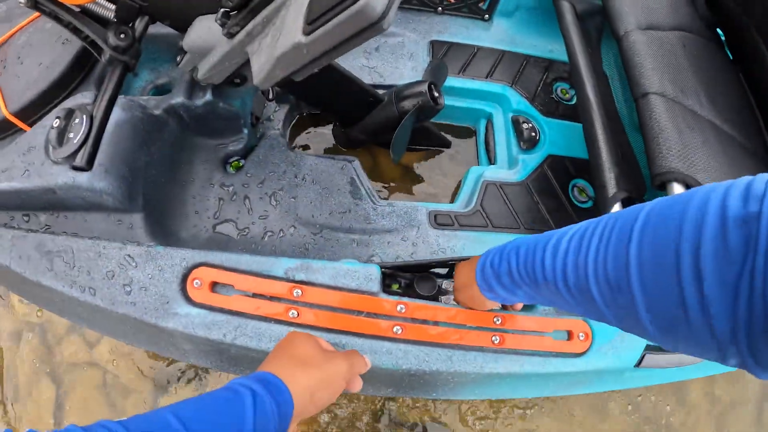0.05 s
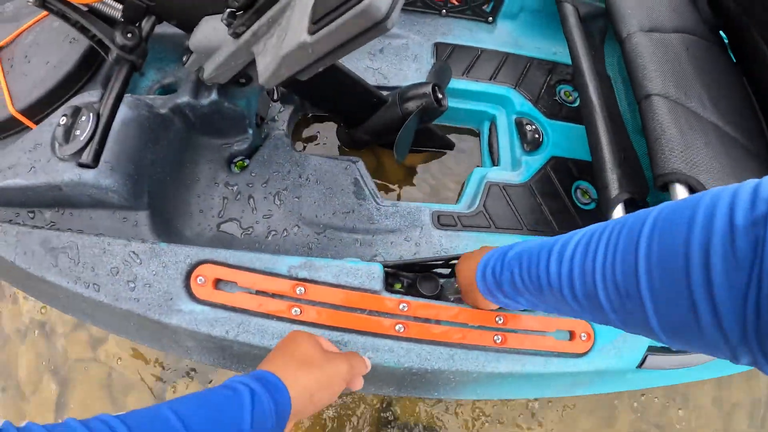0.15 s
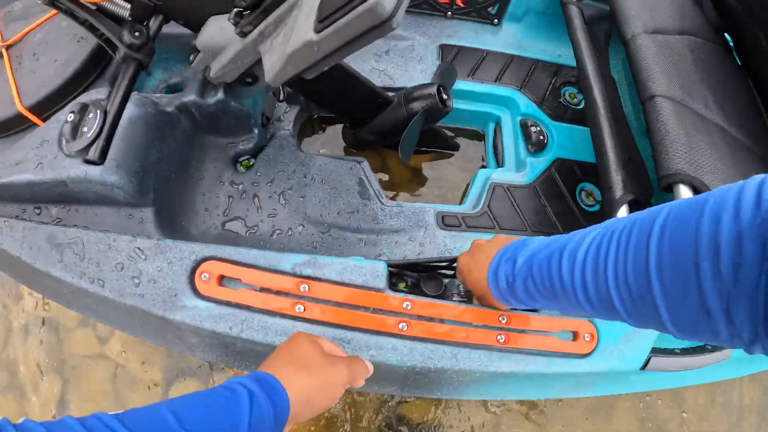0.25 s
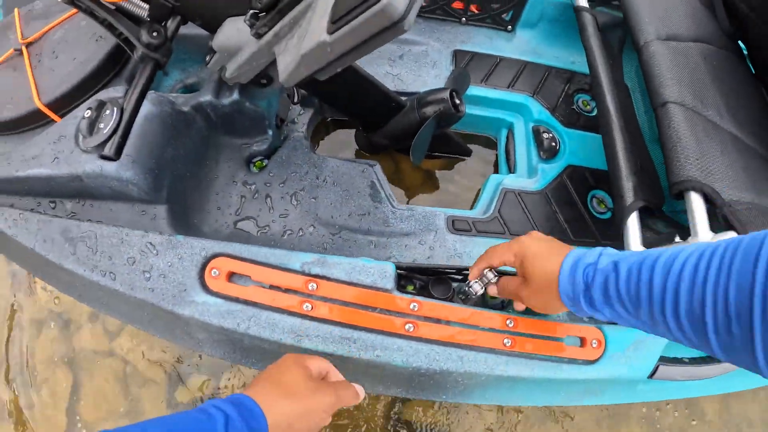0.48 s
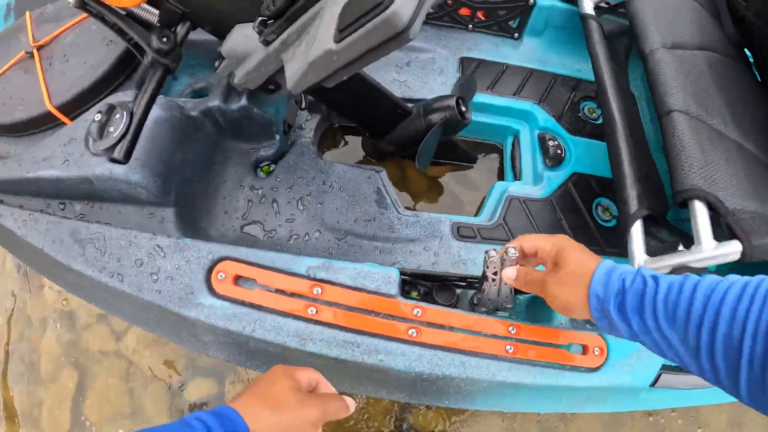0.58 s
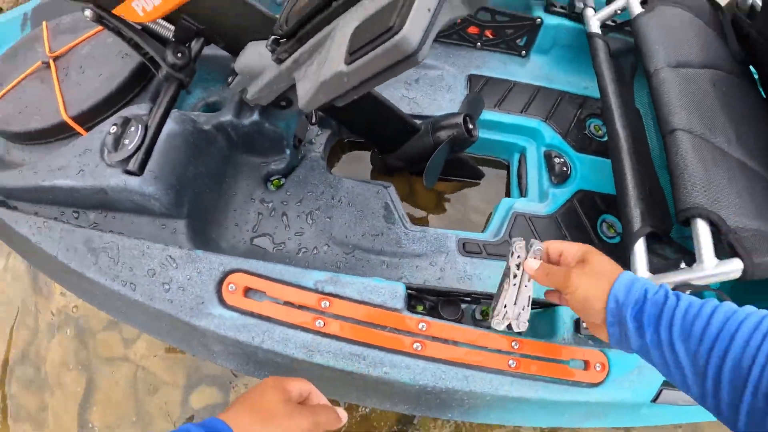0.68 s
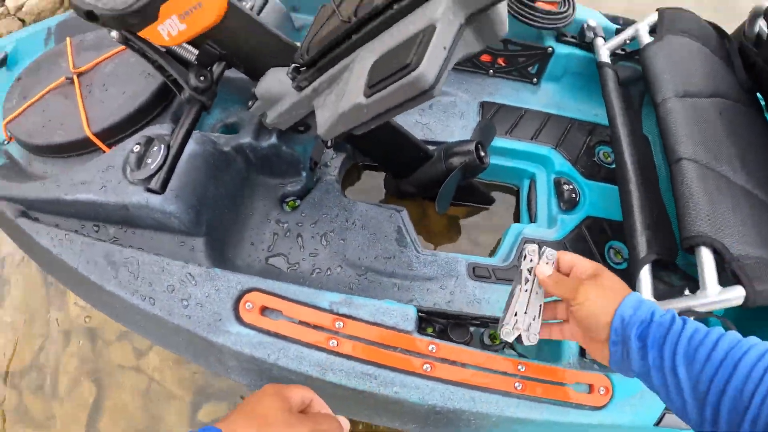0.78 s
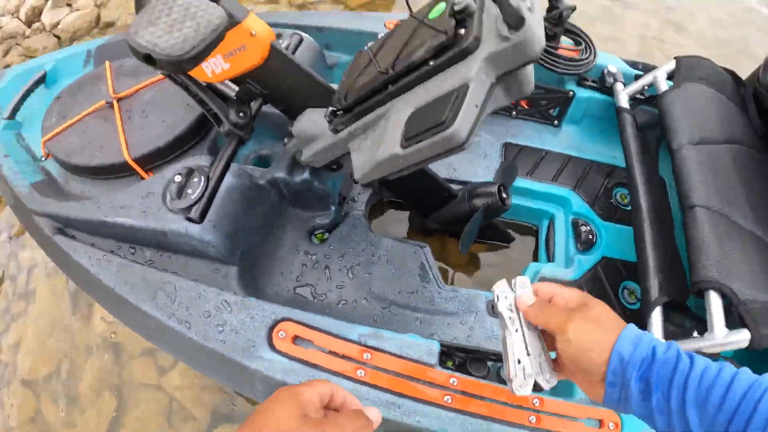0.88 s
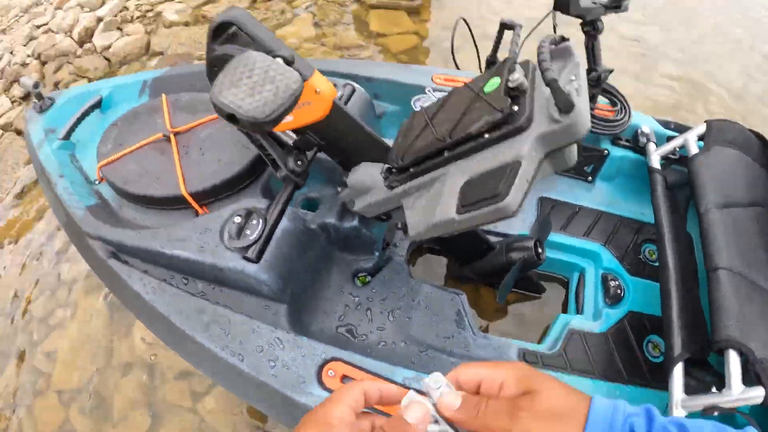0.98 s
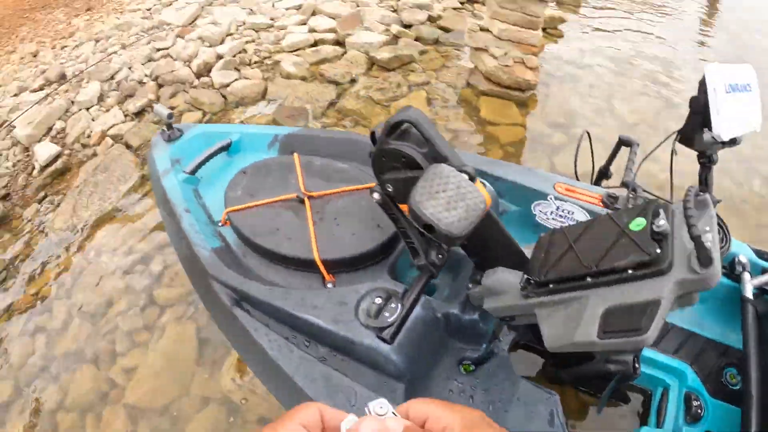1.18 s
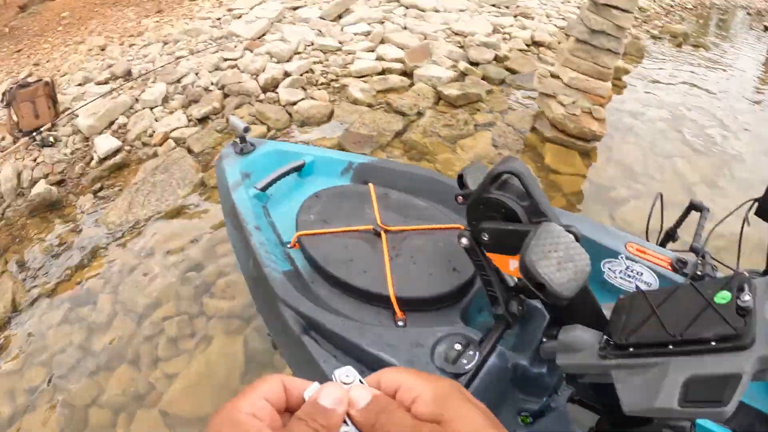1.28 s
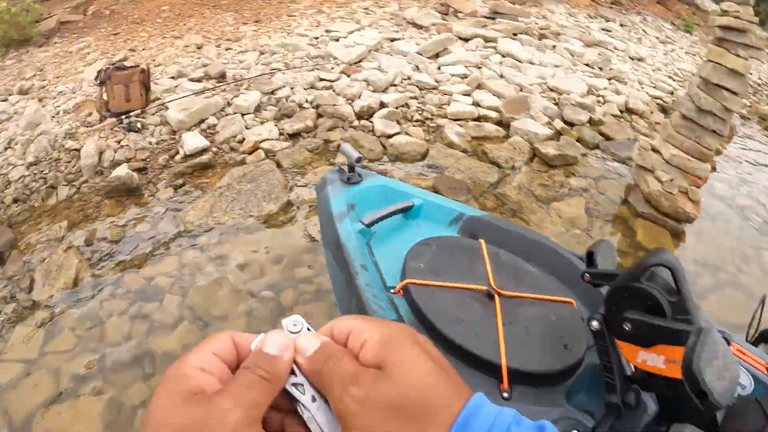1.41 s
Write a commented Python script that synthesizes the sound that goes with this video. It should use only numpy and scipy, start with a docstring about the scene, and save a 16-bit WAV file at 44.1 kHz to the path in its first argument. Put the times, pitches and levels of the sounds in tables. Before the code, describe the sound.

Hollow knocks clatter close by as a steel tool is pulled from a plastic kayak's side pocket, scraping and ringing thinly. Soft handling bumps and a few light taps follow over a quiet lakeshore.

```python
"""Hollow knocks and scrapes sound an arm's length away: a steel multi-tool is being fished out of a side pocket
of a plastic kayak. Each impact excites the hull's resonant modes and leaves a thin metallic ring; between
impacts, stick-slip friction scrapes and drums on the plastic. Soft low bumps, small taps and faint finger
slides follow, over a quiet lakeshore."""
import sys
import numpy as np
from scipy import signal
from scipy.fft import rfft, irfft
from scipy.io import wavfile

SR = 44100
rng = np.random.default_rng(int(sys.argv[2]) if len(sys.argv) > 2 else 0)


def pcm_store(signal):
    """Save signal as 16-bit PCM."""
    levels = np.round(np.clip(np.atleast_2d(signal), -1, 1) * 32767)
    wavfile.write(sys.argv[1], SR, levels.astype(np.int16).T)


N = 63945
T = np.arange(N) / SR
LR = np.array([[1], [-1]])  # sign of the left and right channel

# Impacts in the pocket (time [s], then thud, body, knock, clack, tick and snap strength [dB])
KNOCKS = [(0.19, -24, -50, -47.5, -52, -56.5, -54), (.204, -25, -14, -29, -28.5, -43, -38.5),
          (.228, -30.5, -22, -75, -60, -62, -63), (0.2952, -47, -48, -28.5, -35.5, -42.5, -61),
          (0.325, -32.5, -39.5, -29, -31, -48, -73), (0.3433, -27, -23.5, -34.5, -29, -46, -69),
          (.349, -22, -29, -30, -26.5, -37.5, -62), (.442, -17, -28, -31.5, -37.5, -45.5, -40.5),
          (0.448, -25.5, -14, -95, -18.5, -44.5, -61), (.483, -30.5, -20.5, -26, -26, -35.5, -59),
          (0.4968, -21.5, -26, -28.5, -23.5, -40.5, -47), (0.5456, -21.5, -15.5, -24, -19, -26.5, -35.5),
          (0.557, -13, -16, -27.5, -24.5, -46, -42), (0.6621, -43, -30, -24.5, -18.5, -32.5, -36.5),
          (.674, -26, -30, -37, -23.5, -39, -53), (.680, -19.5, -45, -26, -25.5, -39.5, -43),
          (.699, -22.5, -22.5, -33.5, -39, -39.5, -46), (.712, -20, -23.5, -29.5, -26.5, -53, -53),
          (0.7456, -32, -26, -28.5, -23.5, -33, -39)]
# Light taps (time [s], pitch [Hz], level [dB], t60 [s], upper mode [Hz], upper level [dB],
# click centre [Hz], click level [dB], ring excitation [dB], left minus right [dB])
TAPS = [(1.1149, 156.7, -31, 0.12, 314, -36.5, 842, -33, -26.5, 7),
        (1.306, 645, -53.5, 0.13, 706, -59, 696, -60.5, -58, 1),
        (1.392, 1417, -49.5, 0.069, 1460, -52, 1280, -56, -61, 0),
        (1.400, 333.3, -38.5, 0.28, 1167, -49.5, 1040, -45, -55, 0.5)]
# Diffuse share of the sound (frequency [Hz], side minus mid [dB])
DIFFUSE_SIDE = [(60, -20.5), (380, -28), (700, -9.5), (1300, -18.5), (2300, -4), (4400, -17.5), (13000, -5)]


def knocks():
    """Modal response: each impact rings the hull, with a spectrum set by the contact."""
    # Thud to snap, the six strengths of an impact (frequency [Hz])
    strength_hz = [120, 330, 720, 1550, 4800, 11000]
    # Hull and pocket wall modes (frequency [Hz], relative level [dB], t60 [s])
    hull_modes = [(76.6, -8.5, 0.17), (124.1, -0.5, 0.19), (165, -9, 0.18), (203.5, -3, 0.12),
                  (277, -8, 0.15), (320.6, -6, 0.058), (399.1, -1, 0.12), (628.6, -2.5, 0.085),
                  (720.5, -3, 0.089), (1021.5, -4, 0.092), (1378, -3, 0.052), (1600, -9, 0.032),
                  (1848, -6.5, 0.048), (2083, -1, 0.039)]
    # Short, hard modes at the contact (frequency [Hz], relative level [dB], t60 [s])
    contact_modes = [(3045, -8, 0.025), (3590, -10, 0.043), (4700, -2.5, 0.02), (5200, 0.5, 0.015),
                     (5827, -3, 0.02)]
    # Dense modes of the plastic (frequency [Hz], relative level per half octave [dB], t60 [s])
    plastic = [(70, -14.5, 0.29), (202, -11, 0.14), (470, -4, 0.093), (920, -4, 0.057), (1570, -4.5, 0.032),
               (2410, -11.5, 0.02), (3520, -8, 0.043), (5000, -5.5, 0.014), (6700, -7, 0.0164),
               (8250, -26, 0.031), (12200, -17.5, 0.032), (16000, -36, 0.015)]
    mode_db, scatter_db, detune_spread = -1, 2, 0.017
    rise_cycles, tail_db, tail_t60_s = 0.52, -21, 0.16
    out, t = np.zeros((2, N)), T[:12288]
    modes = hull_modes + contact_modes
    rise = lambda hz: 1 - np.exp(-t * hz / rise_cycles)
    for start, *levels in KNOCKS:
        strength = lambda hz: amp(over_hz(list(zip(strength_hz, levels)), hz))
        for k, (hz, db, t60) in enumerate(modes):
            scatter, detune, side = rng.standard_normal(3)
            channels = stereo_gains(hz) * np.exp(1j * LR * side * amp(over_hz(DIFFUSE_SIDE, hz)))
            swing = np.imag(channels * np.exp(2j * np.pi * hz * (1 + detune_spread * detune) * t))
            gain = (-1) ** k * strength(hz) * amp(db + mode_db + scatter_db * scatter)
            add(out, start, gain * swing * rise(hz) * decay(t, t60))
        for hz in 65 * 2 ** np.arange(0, 8.1, .5):  # overlapping modes merge into noise bands
            fall = decay(t, over_hz(plastic, hz, column=2)) + amp(tail_db) * decay(t, tail_t60_s)
            dense_modes = burst(hz, hz * np.log(2) * 0.66, rise(hz) * fall)
            add(out, start, dense_modes * strength(hz) * amp(over_hz(plastic, hz)))
    return out


def metal_ring():
    """Free decay: clusters of metal modes sum the energy of successive blows."""
    # Clusters (centre [Hz], width [Hz], relative level [dB], t60 [s], left minus right [dB])
    clusters = [(550, 130, -35.5, 1.47, 12), (1840, 320, -27, 1.06, 6.5), (2280, 163, -24.5, 0.67, 3),
                (3400, 730, -40.5, 1.13, 13), (12750, 2000, -42.5, 0.82, 7)]
    ring_db, tap_limit_hz = -9, 2600  # light taps reach only the lower clusters
    out = np.zeros((2, N))
    hard = [(start, clack) for start, *_, clack, tick, snap in KNOCKS]
    light = [(start, db) for start, *_, db, pan in TAPS]
    for hz, width, db, t60, pan_db in clusters:
        blows = hard + light if hz < tap_limit_hz else hard
        energy = sum((T > at) * (amp(level) * decay(np.abs(T - at), t60)) ** 2 for at, level in blows)
        out += band(hz, width, N, wide_db=3) * np.sqrt(energy) * amp(db + ring_db + LR * pan_db / 2)
    return out


def friction(spectrum, levels):
    """Stick-slip friction: dense, uneven clicks filtered by the plastic."""
    slips_per_s, spread_db = 6000, 3
    slipping = rng.random(N) < slips_per_s / SR
    sizes = amp(spread_db * np.minimum(rng.exponential(size=N), 4))
    clicks = slipping * sizes * rng.standard_normal((2, N))
    return colour(clicks, lambda f: amp(over_hz(spectrum, f)), wide_db=0.5) * fader(levels)


def scrape():
    """Sliding friction: steel rasps across plastic."""
    # Rasp spectrum (frequency [Hz], relative density [dB])
    spectrum = [(200, -8), (600, 9), (1300, 3.5), (2600, -9.5), (5800, -13), (7400, -20.5), (8500, -34),
                (14000, -30), (16000, -54)]
    # Rasp envelope (time [s], level [dB])
    levels = [(0, -72.5), (.05, -59.5), (.17, -98), (.225, -56), (.26, -47.5), (.285, -58.5), (.37, -52.5),
              (0.408, -63), (.47, -50), (.54, -43), (.6, -56), (.65, -55), (0.699, -48), (0.739, -38),
              (0.774, -42), (.81, -65), (.9, -102), (1.201, -63), (1.28, -73), (1.37, -65.5), (1.45, -64.5)]
    return friction(spectrum, levels)


def hull_rub():
    """Forced vibration: rubbing makes the hollow hull drum."""
    # Drumming spectrum (frequency [Hz], relative density [dB])
    spectrum = [(40, -20), (110, 0), (170, 3.5), (420, -6.5), (560, -18), (780, -17), (1300, -43),
                (3000, -69), (12000, -86)]
    # Drumming envelope (time [s], level [dB])
    levels = [(0, -65), (0.022, -46.5), (0.048, -39.5), (0.082, -46), (0.131, -58), (.15, -74), (.19, -62),
              (.25, -39), (.3, -39), (.42, -42), (.52, -37.5), (.6, -33), (.65, -37), (.77, -38.5),
              (0.819, -50.5), (.95, -68.5), (1.1, -64), (1.17, -67.5), (1.37, -66.5), (1.45, -74)]
    return friction(spectrum, levels)


def bumps():
    """Slow forcing: each soft push gives a brief low-frequency wave packet."""
    # Pushes (time [s], frequency [Hz], level [dB], length [cycles], left minus right [dB])
    pushes = [(0.626, 44.7, -32, 1.3, 5), (0.703, 62, -22, 1.2, -5), (.727, 31.4, -29, 3.6, -5),
              (.775, 55.5, -32, 0.8, 17), (0.865, 62, -30.5, 1.7, -4.5), (.893, 72.5, -26, 0.73, -6.5),
              (0.91, 35.1, -25, 1.4, -4.5), (0.913, 96, -29.5, 0.94, -8.5), (0.949, 40, -40, 1.5, -10),
              (1.032, 69, -38.5, 2.9, -6), (1.324, 28.6, -41, 1.34, 3.5)]
    out = np.zeros((2, N))
    for at, hz, db, cycles, pan_db in pushes:
        envelope = np.exp(-(2 * (T - at) * hz / cycles) ** 2)
        out += amp(db + LR * pan_db / 2) * np.sin(2 * np.pi * hz * (T - at)) * envelope
    return out


def taps():
    """Damped oscillation: turned in the hands, the tool taps with a dull click and two modes."""
    click_t60_s, upper_t60_s, attack_s = 0.024, 0.07, 0.00039
    out, t = np.zeros((2, N)), T[:8192]
    attack = 1 - np.exp(-t / attack_s)
    mode = lambda hz, db, t60: amp(db) * np.sin(2 * np.pi * hz * t) * decay(t, t60) * attack
    for start, hz, db, t60, upper_hz, upper_db, click_hz, click_db, _, pan_db in TAPS:
        click = amp(click_db) * burst(click_hz, click_hz, decay(t, click_t60_s) * attack)
        tone = mode(hz, db, t60) + mode(upper_hz, upper_db, upper_t60_s)
        add(out, start, (tone + click) * amp(LR * pan_db / 2))
    return out


def finger_slides():
    """Friction noise: fingers swish faintly over the steel."""
    # Swishes (time [s], half-length [s], centre [Hz], width [Hz], level [dB])
    swishes = [(1.136, 0.016, 1530, 303, -54.5), (1.287, 0.019, 3180, 1200, -65.5),
               (1.329, .007, 4120, 800, -65), (1.425, 0.026, 1300, 397, -59.5),
               (1.44, 0.024, 2650, 700, -63), (1.44, 0.038, 491, 109, -53)]
    return sum(amp(db) * band(hz, width, N) * np.exp(-((T - at) / half_length) ** 2)
               for at, half_length, hz, width, db in swishes)


def shore():
    """Ambient noise: air and water make a quiet, diffuse field."""
    # Shore spectrum (frequency [Hz], relative density [dB])
    spectrum = [(20, 3.5), (70, -2), (150, -13.5), (400, -28.5), (1100, -29.5), (2200, -27), (2700, -36),
                (7000, -44), (10000, -52), (14000, -46), (16000, -67)]
    # Shore envelope (time [s], level [dB])
    levels = [(0, -60), (.17, -60.5), (.8, -54.5), (1.08, -52), (1.2, -51.5), (1.45, -54)]
    noise = rng.standard_normal((2, N))
    return colour(noise, lambda f: amp(over_hz(spectrum, f)), wide_db=7) * fader(levels)


def stereo_gains(hz):
    """Level and phase differences between the channels, as two complex gains."""
    # Level difference (frequency [Hz], left minus right [dB])
    balance = [(60, -2), (380, 1), (700, -3), (1300, 1), (4400, -2), (8000, 2.5), (14000, 2)]
    # Phase difference (frequency [Hz], left lead [rad])
    lead = [(300, -0.019), (1290, -0.42), (2200, -1.3), (2700, 0.47), (3300, -1.3), (4500, -0.66),
            (6500, 0.81), (11000, 0.17)]
    return amp(LR * over_hz(balance, hz) / 2) * np.exp(.5j * LR * over_hz(lead, hz))


def colour(pair, gain, wide_db=0):
    """Mid-side stereo: filter a pair by gain(Hz), at rms 1; wide_db raises the side."""
    f = np.fft.rfftfreq(pair.shape[1], 1 / SR)
    mid, side = rfft(pair) * gain(f)
    side_gain = amp(np.minimum(over_hz(DIFFUSE_SIDE, f) + wide_db, 0))
    return unit(irfft((mid + LR * side * side_gain) * stereo_gains(f), pair.shape[1]))


def band(hz, width, size, wide_db=0):
    """Band-pass filtering: stereo noise in one steep band."""
    noise = rng.standard_normal((2, size))
    return colour(noise, lambda f: 1 / (1 + (2 * (f - hz) / width) ** 6), wide_db)


def burst(hz, width, envelope):
    """Amplitude modulation: band noise with an envelope's shape and energy."""
    return unit(band(hz, width, len(envelope)) * envelope) * np.sqrt(np.mean(envelope ** 2))


def amp(db):
    """Decibels to amplitude ratio."""
    return 10 ** (np.asarray(db) / 20)


def over_hz(table, hz, column=1):
    """Interpolation of a column over log frequency."""
    rows = np.array(table, float)
    return np.interp(np.log(np.maximum(hz, 1)), np.log(rows[:, 0]), rows[:, column])


def fader(table):
    """Gain interpolated from (time [s], level [dB]) points."""
    return amp(np.interp(T, *np.array(table, float).T))


def decay(t, t60):
    """Exponential damping: 60 dB in t60 seconds."""
    return np.exp(-np.log(1000) * t / max(t60, 1e-3))


def unit(x):
    """Normalisation to rms 1."""
    return x / np.sqrt(np.mean(x ** 2) + 1e-30)


def add(out, start, sound):
    """Superposition of a sound from a start time on."""
    i = int(np.clip(start * SR, 0, N - 1))
    out[:, i:i + sound.shape[1]] += sound[:, :N - i]


def scene():
    """Superposition of all sources at the microphone."""
    return knocks() + metal_ring() + taps() + bumps() + finger_slides() + scrape() + hull_rub() + shore()


def record(dry):
    """Frequency response: two narrow dips, a slight peak and a steep treble cut."""
    # Microphone ripples (centre [Hz], width [Hz], gain [dB])
    ripples = [(2450, 225, -1), (4260, 380, 0.5), (870, 87, -4)]
    cutoff_hz = 15600
    for hz, width, db in ripples:
        resonance = signal.lfilter(*signal.iirpeak(hz, hz / width, fs=SR), dry)
        dry = dry + (amp(db) - 1) * resonance
    return signal.sosfilt(signal.ellip(8, .2, 70, cutoff_hz, fs=SR, output="sos"), dry)


dry = scene()
out = record(dry)
pcm_store(out)
```